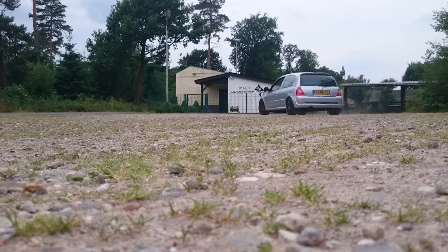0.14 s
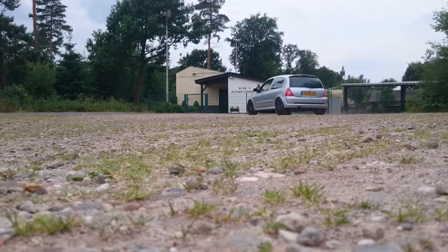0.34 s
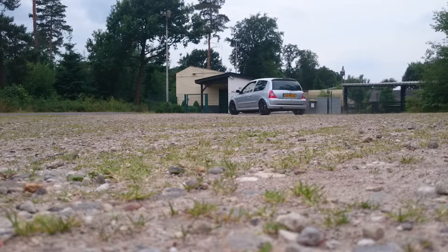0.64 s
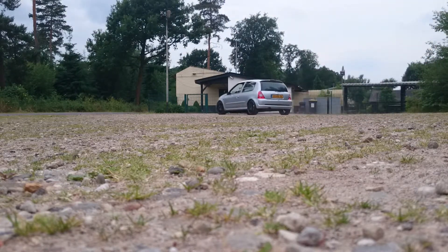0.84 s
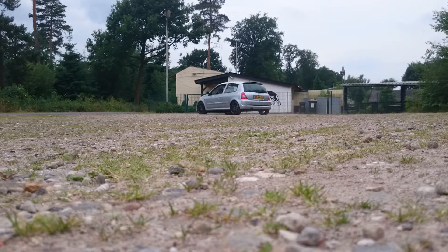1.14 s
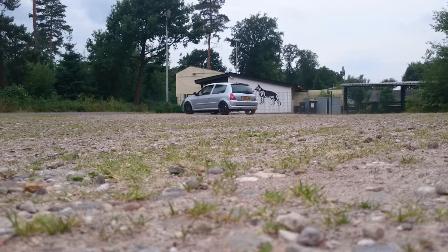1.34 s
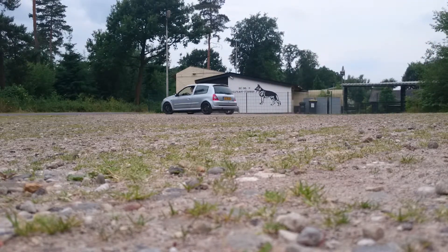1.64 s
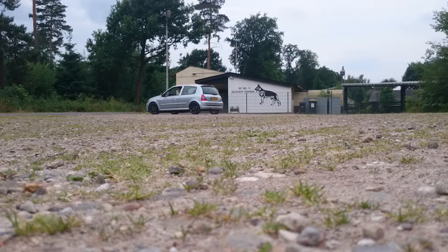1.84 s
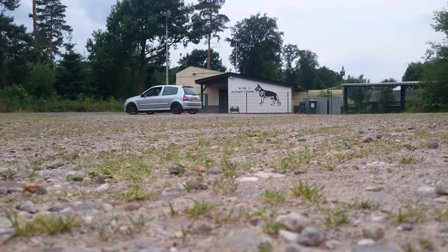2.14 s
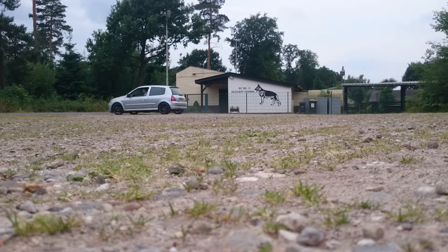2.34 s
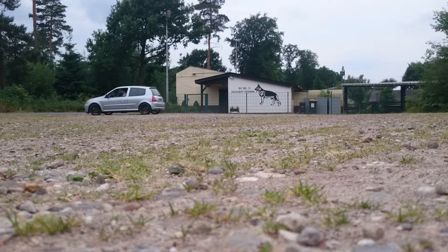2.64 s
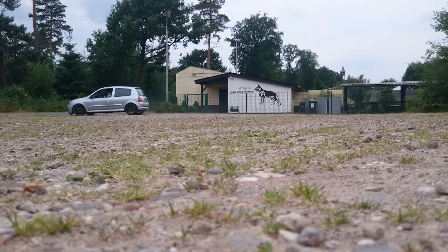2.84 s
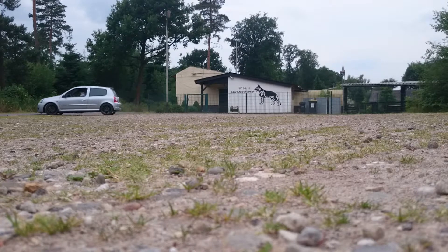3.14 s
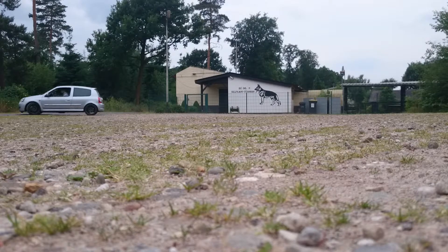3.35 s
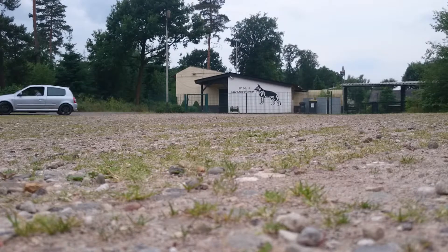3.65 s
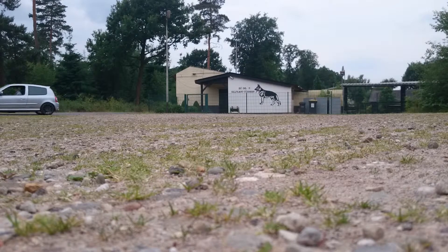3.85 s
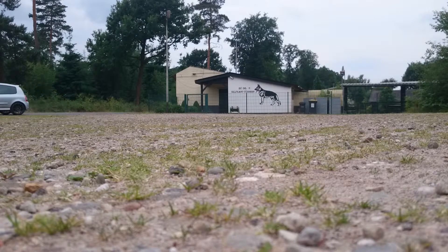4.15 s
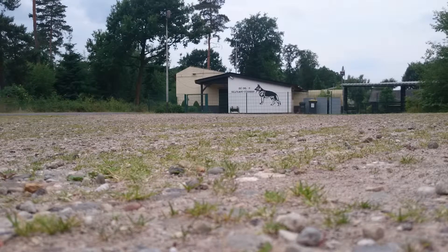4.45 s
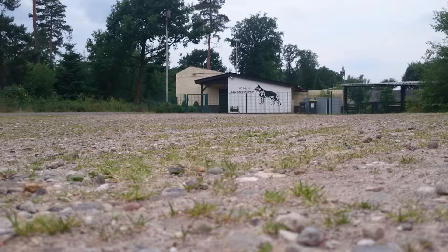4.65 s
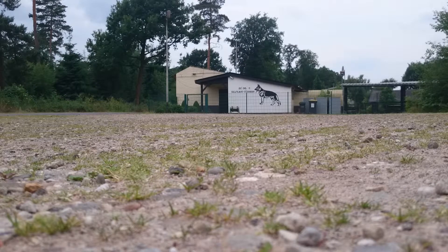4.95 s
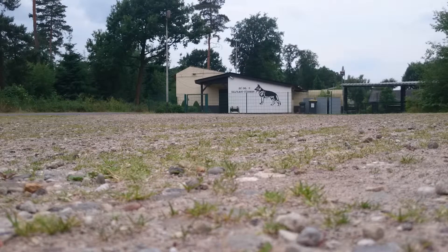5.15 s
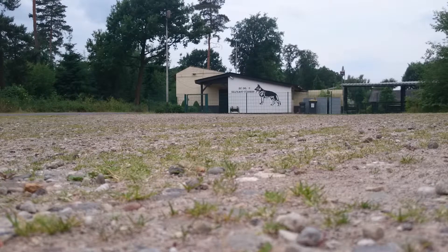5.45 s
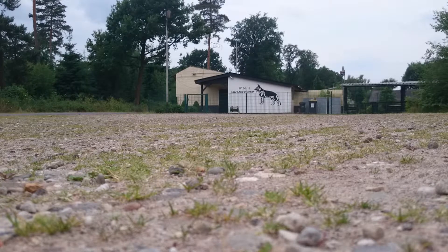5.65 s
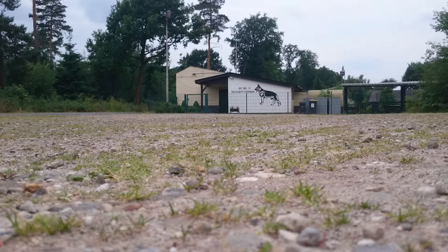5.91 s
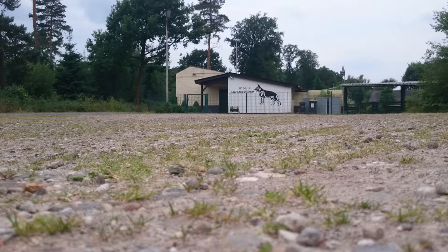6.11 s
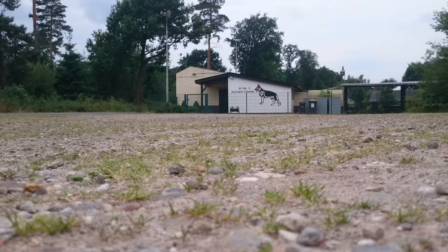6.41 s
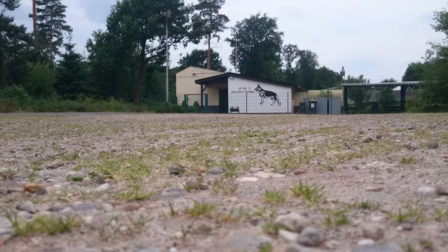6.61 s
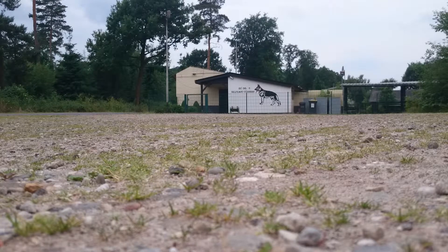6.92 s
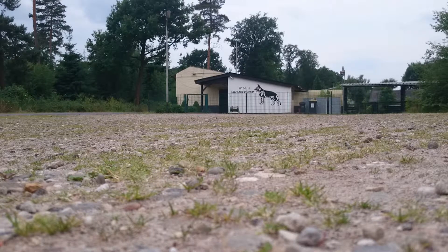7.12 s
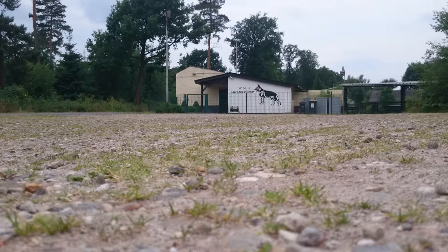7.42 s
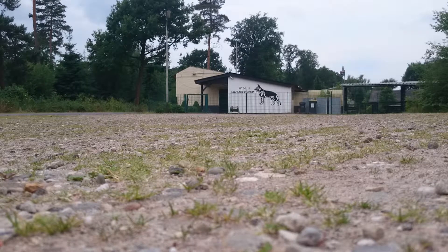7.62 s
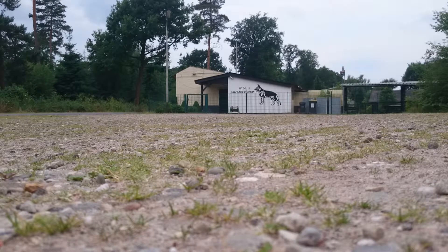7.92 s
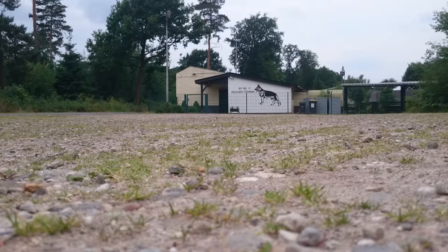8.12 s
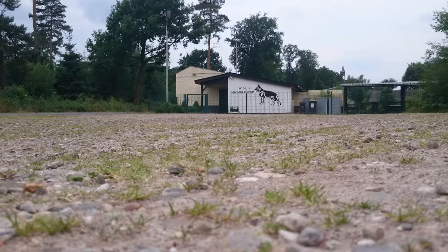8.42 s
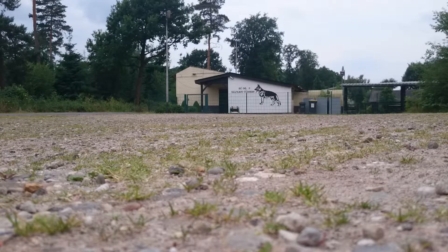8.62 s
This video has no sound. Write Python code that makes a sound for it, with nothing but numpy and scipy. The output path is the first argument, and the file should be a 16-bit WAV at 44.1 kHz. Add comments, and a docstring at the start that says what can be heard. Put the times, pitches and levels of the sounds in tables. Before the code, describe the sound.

Open gravel lot, fixed low stereo microphone, quiet air with slight hiss. From 0 to 4 s a small four-cylinder car creeps past from slightly right of centre toward the left: low, uneven exhaust burble around 55-65 Hz, brief throttle at the start, then nearly idle, with gravel grinding in clumps and dry stone snaps, densest in the first half second. Very faint bird chirps near 1.2 and 3 s. After 4 s the crunch thins and the exhaust boom swells, climbing steadily from 5 s. From 6.3 to 7.5 s it is full throttle, a loud raspy snarl reaching about 220 Hz, tyres spinning and spraying stones. At 7.6 s the throttle shuts: revs drop, hissing and sputtering, a strong bang at 7.85 s and smaller pops after. At 8.23 s the next gear bites with a hard bark near 140 Hz that eases, still driving at the end around 8.8 s. Trees return a soft diffuse echo.

```python
"""Car pulling away over gravel

A small four-cylinder hatchback with a sport exhaust creeps over a gravel lot, then revs hard away to the left.
The driver lifts for a gear change, the exhaust burbles and pops, and the next gear bites.
The engine is a sum of orders (multiples of the firing rate), uneven firing pulses and gas noise; the tyres
are showers of stone contacts. Trees and sheds answer with a diffuse echo, a far bird chirps,
and the two capsules of the stereo microphone have opposite polarity."""
import sys
import numpy as np
from scipy import signal
from scipy.fft import rfft, irfft, next_fast_len
from scipy.io import wavfile
from scipy.ndimage import map_coordinates

SR = 44100
rng = np.random.default_rng(int(sys.argv[2]) if len(sys.argv) > 2 else 0)


def persist_wave(psi):
    """Save psi, clipped to +-1, as 16-bit WAV."""
    counts = np.round(np.clip(psi, -1, 1) * 32767).astype(np.int16)
    wavfile.write(sys.argv[1], SR, np.atleast_2d(counts).T)


N = 386757


def amp(db):
    """Logarithmic level: decibels to amplitude gain."""
    return 10 ** (np.asarray(db) / 20)


def unit(x):
    """Power normalisation: x at rms 1."""
    return x / np.sqrt(np.mean(x ** 2) + 1e-20)


def along(points, hz):
    """Logarithmic frequency scale: (Hz, value) points read on a log axis."""
    f, v = np.transpose(points)
    return np.interp(np.log(hz + 1), np.log(f + 1), v)


def clock():
    """Uniform sampling: the time of every sample in seconds."""
    return np.arange(N) / SR


def curves(rows):
    """Linear interpolation: one value per sample for each column after the time."""
    s, *cols = np.transpose(rows)
    return [np.interp(clock(), s, c) for c in cols]


def level(rows, fade_s=0.16):
    """Level envelope: gain of a (s, dB) curve with exponential decay outside its span."""
    outside = np.maximum(rows[0][0] - clock(), 0) + np.maximum(clock() - rows[-1][0], 0)
    return amp(curves(rows)[0]) * np.exp(-outside / fade_s)


def wobble(rate):
    """Band-limited random modulation: a smooth curve through random knots, rate knots a second."""
    knots = rng.standard_normal(int(N * rate / SR) + 4)
    coarse = np.arange(0, N + 32, 32)
    smooth = map_coordinates(knots, [coarse * rate / SR])
    return np.interp(np.arange(N), coarse, smooth)


def filtered(x, response):
    """Linear filtering: the spectrum of x times a response of frequency."""
    m = next_fast_len(N + SR // 4)
    return irfft(rfft(x, m) * response(np.fft.rfftfreq(m, 1 / SR)), m)[..., :N]


def ring(x, colour, size=8192):
    """Minimum-phase resonance: x through a causal body with the given (Hz, dB) colour."""
    cepstrum = irfft(np.log(amp(along(colour, np.fft.rfftfreq(size, 1 / SR)))))
    # folding the cepstrum onto positive time makes the response causal
    cepstrum[1:size // 2] *= 2
    cepstrum[size // 2 + 1:] = 0
    return signal.oaconvolve(x, irfft(np.exp(rfft(cepstrum))))[:N]


def spikes(times, sizes):
    """Impulse excitation: impulses shared between the two neighbouring samples."""
    at = np.clip(np.asarray(times) * SR, 0, N - 2)
    i = at.astype(int)
    return np.bincount(i, sizes * (1 - at + i), N) + np.bincount(i + 1, sizes * (at - i), N)


# Engine speed: creeping, the pull in first gear, the fall with the clutch out, second gear.
# Each row: time in seconds, firings per second.
SPEED = [(0,58.2),(.5,65.5),(.75,62.5),(1.1,59.5),(1.5,56.7),(2.3,56.6),(2.8,53.6),(3.1,55.3),(3.3,61.3),(3.42,61.5),(3.65,63.7),(3.92,61.4),(4.2,67.7),(4.6,77),(4.9,82.3),
         (5.2,88.2),(5.5,101.7),(5.8,115),(6.35,154.1),(6.9,190),(7.2,208.4),(7.55,222.6),(7.75,207),(8.12,165),(8.23,144),(8.29,139),(8.36,138),(8.77,145.6)]


def firing_rate():
    """Fundamental frequency: the firing rate, on which every engine order is built."""
    return curves(SPEED)[0]


# Throttle opening. Each row: time in seconds, opening from 0 to 1.
THROTTLE = [(0, 0.34), (.55, 0.13), (.72, 0.02), (1.55, 0.16), (2.4, 0.02), (3.05, 0.07), (3.22, 0.21),
            (3.97, 0.16), (4.7, 0.52), (5.95, 0.4), (6.3, 0.96), (7.545, 0.76), (7.595, 0), (7.75, 0.14),
            (8.0, 0), (8.215, 0.07), (8.24, 0.98), (8.46, 0.67), (8.57, 0.31), (8.77, 0.5)]


def throttle():
    """Load control: how far the throttle is open, 0-1."""
    return np.clip(curves(THROTTLE)[0], 0, 1)


# the gear change: the throttle shuts, the burble builds, the next gear bites with a surge that dies away
LIFT_S, BURBLE_RISE_S = 7.61, 0.05
BITE_S, BITE_RISE_S, SURGE_FADE_S = 8.228, 0.016, 0.28


def bite():
    """Clutch engagement: rises from 0 to 1 as the next gear engages."""
    return np.clip((clock() - BITE_S) / BITE_RISE_S, 0, 1)


def surge():
    """Transient load: rises as the next gear bites, then decays exponentially."""
    return bite() * np.exp(-np.abs(clock() - BITE_S) / SURGE_FADE_S)


def overrun():
    """Overrun: rises to 1 after the lift and ends as the next gear bites."""
    return np.clip((clock() - LIFT_S) / BURBLE_RISE_S, 0, 1) * (1 - bite())


def order(turns, k):
    """Harmonic phase: k times the firing rate, the orders aligned into one pulse smeared by the long pipe."""
    skew, smear = .2, .24
    return -np.cos(2 * np.pi * k * turns - (skew + smear * k) * (k - 1))


# Level of the boom at the firing rate. Each row: time in seconds, level in dB.
BOOM = [(0,-22),(.5,-20.5),(1.6,-26.5),(2.15,-33),(2.95,-29.5),(3.3,-23),(3.92,-23.5),(4.03,-15.5),(5.15,-15),(5.45,-13.5),(6.1,-17.5),(6.45,-14.5),(6.75,-18),(7,-15.5),(7.25,-19),
        (7.57,-18.5),(7.615,-30),(7.66,-18),(8.02,-16.5),(8.195,-25),(8.245,-11),(8.45,-14),(8.6,-18.5),(8.77,-14)]
# Level of the hum at twice the firing rate. Each row: time in seconds, level in dB.
SECOND = [(0,-27.5),(.5,-29.5),(.8,-46.5),(2.1,-29.5),(2.45,-42),(2.9,-26.5),(3.3,-26),(4.1,-31.5),(5,-26),(5.85,-22),(6.14,-35.5),
          (6.35,-24),(6.8,-22),(7,-28),(7.3,-19.5),(7.57,-21),(7.63,-45.5),(7.8,-28.5),(8,-44.5),(8.222,-49),(8.245,-20),(8.77,-34)]
# Level of the hum at three times the firing rate. Each row: time in seconds, level in dB.
THIRD = [(0,-30.5),(.5,-30),(.7,-37),(2.2,-39.5),(3,-38),(3.25,-29),(3.42,-37),(3.65,-32),(4,-27.5),(4.45,-39.5),(5.25,-29),(5.8,-42),(6.15,-31),
         (6.35,-47.5),(6.7,-30.5),(7.33,-38),(7.45,-36),(7.56,-39),(7.62,-61.5),(8.222,-64),(8.245,-25.5),(8.77,-39)]


def drone(turns, rough=0.049, waver_db=1.0, sputter=0.39):
    """Harmonic synthesis: the three lowest orders boom; on the overrun they throb every fourth firing."""
    second = level(SECOND) * amp(waver_db * wobble(7))
    third = level(THIRD) * amp(waver_db * wobble(8))
    throb = sputter * overrun() * np.cos(2 * np.pi * turns / len(CYLINDERS))
    out = np.zeros(N)
    for k, gain in enumerate([level(BOOM), second, third], 1):
        swell = 1 + rough * k * wobble(35) + throb
        out += np.sqrt(2) * gain * swell * order(turns, k)
    return out


# Return from the far wall, as the car passes it. Each row: time in seconds, level in dB re the direct boom.
WALL = [(3.9, -26), (4.6, -19), (5.2, -12), (5.7, -28), (8.2, -26), (8.55, -18)]
WALL_DELAY_S = .177


def wall(x):
    """Delayed interference: a far wall returns the boom, which beats against it as the pitch climbs."""
    late = np.interp(clock() - WALL_DELAY_S, clock(), x, left=0)
    return x + amp(curves(WALL)[0]) * late


# The upper orders come and go as the revs rise. Each row: firings per second, level in dB at full throttle
# before the surge.
TUNING = [(58, -46.5), (68, -47), (80, -48.5), (95, -46), (120, -49.5), (140, -49.5), (155, -43.5),
          (170, -49.5), (195, -42.5), (212, -44), (223, -49)]
IDLE_AIR = 0.036  # share of the air that passes a shut throttle
SURGE_DB = 10


def overtones(firing_hz):
    """Source and resonator: the cylinders' charge times the pipe's tuning sets the upper orders' gain."""
    charge = (IDLE_AIR + (1 - IDLE_AIR) * throttle()) * amp(SURGE_DB * surge())
    return charge * amp(along(TUNING, firing_hz))


# Upper orders of the firing rate. Each row: multiple of the firing rate, relative level in dB.
ORDERS = [(4, 10.5), (5, 10), (6, 5.5), (7, 1.7), (8, -4.5), (9, -8), (10, -12.6)]
# Pipe resonances on the upper orders. Each row: frequency in Hz, gain in dB.
PIPE = [(215,3), (260,8.5), (330,-7.5), (400,3), (470,-5.5), (560,0), (620,0.5), (700,-0.5), (780,-3),
        (850,3.5), (920,2), (1000,4), (1080,7.5), (1160,-5), (1300,1), (1600,-5)]


def bark(turns, firing_hz, upper, waver_db=1.0, bark_db=0.24, rough=.13):
    """Formant resonance: ragged upper orders swell as they sweep through the pipe's resonances."""
    shaken = turns + .006 * wobble(60)
    out = np.zeros(N)
    for k, db in ORDERS:
        gain = amp(db + along(PIPE, k * firing_hz) + waver_db * wobble(11))
        ragged = 1 + rough * wobble(70)
        out += gain * ragged * order(shaken, round(k))
    return np.sqrt(2) * upper * amp(bark_db) * out


# Departure of each cylinder's pulse from the mean. Each entry: relative size, in firing order.
CYLINDERS = [0.72, -0.22, 0.0073, -0.14]


def uneven(turns, scatter):
    """Subharmonic excitation: each firing departs from the mean by a four-cylinder pattern plus chance."""
    firing = np.arange(1, int(turns[-1]))
    times = np.interp(firing, turns, clock())
    sizes = np.take(CYLINDERS, firing % len(CYLINDERS)) + scatter * rng.standard_normal(len(firing))
    # the root of the spacing keeps the power steady as the firings crowd together
    return spikes(times, sizes * np.sqrt(np.gradient(times)))


RASP_HZ = 200  # reference firing rate for levels that grow with revs
# Colour of uneven firing under load. Each row: frequency in Hz, gain in dB.
LOADED = [(30, -33), (60, -22.5), (100, -1), (170, 3), (260, -4), (300, 0), (350, 2), (450, -14),
          (600, -12), (1200, -56), (3000, -90.5)]
# Colour of uneven firing with the throttle shut. Each row: frequency in Hz, gain in dB.
COASTING = [(30, -20), (60, -12), (90, 5.5), (160, -6.5), (245, 0.5), (330, -10), (440, -18), (510, -14),
            (600, -34), (1200, -68), (3000, -91.5)]
# uneven firing: base, then added by full throttle, on the overrun, and as the next gear bites
BURBLE_DB, BURBLE_THROTTLE_DB, BURBLE_OVERRUN_DB, BURBLE_SURGE_DB = -39.5, 9, 16, 9


def burble(turns, firing_hz, loaded_db=0.5, coasting_db=0.0, db_per_octave=2.5):
    """Impulse-driven resonance: unequal firings thump the silencer, recoloured as the throttle shuts."""
    opening = throttle()
    growth_db = db_per_octave * np.log2(firing_hz / RASP_HZ)
    loaded = amp(loaded_db + growth_db) * unit(ring(uneven(turns, scatter=0.33), LOADED))
    coasting = amp(coasting_db) * unit(ring(uneven(turns, scatter=0.42), COASTING))
    db = BURBLE_DB + BURBLE_THROTTLE_DB * opening
    db = db + BURBLE_OVERRUN_DB * overrun() + BURBLE_SURGE_DB * surge()
    # equal-power crossfade with the throttle
    return amp(db) * (np.sin(np.pi / 2 * opening) * loaded + np.cos(np.pi / 2 * opening) * coasting)


# Colour of gas tearing out of the tailpipe. Each row: frequency in Hz, gain in dB.
RASP_COLOUR = [(200, -36), (480, 12), (620, 5), (850, 5.5), (1050, 5.5), (1350, -0.5), (1800, -18.5),
               (2600, -32), (5000, -47)]
# base at full throttle and RASP_HZ, growth with revs, loss with the throttle shut, added by the surge
RASP_DB, RASP_DB_PER_OCTAVE, RASP_SHUT_DB, RASP_SURGE_DB = -27.5, 13, -10, 5.5


def rasp(turns, firing_hz, pulse_db=-10, gas_db=-2, puff=0.18, sputter_db=4.0):
    """Modulated jet noise: pulse fronts and puffs of turbulence snarl, more so with revs and throttle."""
    fronts = unit(ring(uneven(turns, scatter=0.19), RASP_COLOUR))
    puffs = np.exp(puff * np.cos(2 * np.pi * turns))
    gas = unit(ring(rng.standard_normal(N) * puffs, RASP_COLOUR))
    db = RASP_DB + RASP_DB_PER_OCTAVE * np.log2(firing_hz / RASP_HZ)
    db = db + RASP_SHUT_DB * (1 - throttle()) + RASP_SURGE_DB * surge()
    sputter = sputter_db * overrun() * wobble(40)
    return amp(db + sputter) * (amp(pulse_db) * fronts + amp(gas_db) * gas)


# Colour of the bright rush of gas on the overrun. Each row: frequency in Hz, gain in dB.
RUSH_COLOUR = [(500, -26), (900, 2.5), (1700, 0), (2600, -5.5), (3300, -10.5), (4500, -33.5), (9000, -49.5)]


def rush(turns, firing_hz, rush_db=-36, db_per_octave=14, puff=.25, falling_db=-10):
    """Flow noise: on the overrun the pipe hisses, and a broken trace of the fourth order falls with the revs."""
    puffs = np.exp(puff * np.cos(np.pi * turns))  # one puff every second firing
    gas = unit(ring(rng.standard_normal(N) * puffs, RUSH_COLOUR))
    falling = amp(falling_db) * wobble(45) * order(turns, k=4)
    growth_db = db_per_octave * np.log2(firing_hz / RASP_HZ)
    return overrun() * amp(rush_db + growth_db) * (gas + falling)


# labouring: centre and width of its range of firing rates, level of the half order it adds
LUG_HZ, LUG_WIDTH_HZ, LUG_DB = 69.2, 7.7, -30


def lug(turns, firing_hz, waver_db=2.0):
    """Half-order vibration: labouring at low revs adds an unsteady tone between the first two orders."""
    near = np.exp(-((firing_hz - LUG_HZ) / LUG_WIDTH_HZ) ** 2)
    strength = amp(LUG_DB + waver_db * wobble(14)) * near
    return np.sqrt(2) * strength * order(turns, 1.5)


# Fuel igniting in the pipe. Each row: time in seconds, peak level in dB.
POPS = [(7.844, -6), (8.02, -22), (8.129, -17), (8.228, -11)]
# Colour of a pop. Each row: frequency in Hz, gain in dB.
POP_COLOUR = [(40, -15), (100, -6), (260, 10), (450, -8.5), (800, -13), (1500, -36), (5000, -76)]


def pops():
    """Impulse response: single bangs ring the pipe around the gear change."""
    s, db = np.transpose(POPS)
    peak = np.abs(ring(spikes([0], 1.0), POP_COLOUR)).max()
    return -ring(spikes(s, amp(db)), POP_COLOUR) / peak


# Whine of a toothed drive on the engine. Each row: time in seconds, level in dB.
WHINE = [(4.1, -87), (4.45, -74), (5, -79), (5.4, -83), (5.7, -92)]


def whine(turns, slip=.12):
    """Gear-mesh tone: 44 teeth mesh per firing, with a slightly unsteady phase."""
    teeth = 44
    return level(WHINE) * np.sqrt(2) * np.sin(2 * np.pi * (teeth * turns + slip * wobble(90)))


def grains(colour, rate, spread_db):
    """Random impulse train: many tiny stone contacts per second, a few much louder than the rest."""
    when, size, sign = rng.random((int(rate * N / SR), 3)).T
    loud_db = spread_db * np.minimum(-np.log(1 - size), 4)
    contacts = spikes(when * N / SR, amp(loud_db) * np.sign(sign - .5))
    return unit(ring(contacts, colour))


# Tyres rolling slowly over stones. Each row: time in seconds, level in dB before crunch_db.
CRUNCH = [(0, -33.5), (.25, -38), (.7, -40), (2.6, -41.5), (3.1, -45.5), (4.6, -49.5)]
# A tyre grinds through a loose patch. Each row: start in seconds, length in seconds, dB over the rolling.
PATCHES = [(.32,0.16,2),(0.813,0.21,4.5),(1.123,0.058,11),(1.41,0.024,10),(1.483,0.042,10),(1.67,0.066,5.5),(2.078,0.31,3.5),(2.56,0.082,3),(3.146,0.045,11),(3.212,0.29,9),(4.019,0.029,8.5)]
PATCH_ATTACK_S, PATCH_RELEASE_S = .016, 0.04
# Colour of ground gravel. Each row: frequency in Hz, gain in dB.
GRAVEL_COLOUR = [(200, -25.5), (450, -10), (750, 0.5), (1100, -1), (1500, -7.5), (2200, -14.5), (3200, -25),
                 (4400, -45.5), (9000, -55.5)]


def crunch(clump_db=2.17, crunch_db=-2.0):
    """Granular contact noise: slow tyres grind the gravel in clumps, louder in the loose patches."""
    contacts, t = grains(GRAVEL_COLOUR, rate=3200, spread_db=3.8), clock()
    swells = []
    for s, length, db in PATCHES:
        attack = np.clip((t - s) / PATCH_ATTACK_S, 0, 1)
        release = np.exp(-np.maximum(t - s - length, 0) / PATCH_RELEASE_S)
        swells.append(db * attack * release)
    loose_db = np.max(swells, axis=0)
    return level(CRUNCH) * amp(crunch_db + loose_db + clump_db * wobble(45)) * contacts


# Stones snapping under a tyre. Each row: time in seconds, relative level in dB, middle pitch in Hz.
STONES = [(.05,-25,1100), (0.098, -22, 1090), (0.317, -15, 1600), (.322,-19.5,1140), (.349,-24,1390),
          (.377, -22, 1390), (.384,-22,1160), (.413,-25,860), (0.433, -17.5, 1190), (.455, -19.5, 1250),
          (.535,-21.5,1300), (.566, -24, 1510), (.59,-26,1700), (.785,-24,1310), (.833, -22, 1010),
          (.957, -24, 1100), (1.169, -21, 1000), (1.188,-23,1000), (1.308,-23,1180), (1.358,-23,1197),
          (1.435, -20, 940), (1.515,-24,990), (1.674,-24,1190), (1.699,-24,900), (1.899, -22, 1200),
          (2.093, -22, 1090), (2.311,-28,1320), (2.404,-25,1200), (2.462,-26,1200), (2.534,-27,1181),
          (2.604,-27,1090), (2.759, -25, 900), (3.164, -23.5, 1050), (3.176,-24,1200), (3.183, -19, 1251),
          (3.215,-27,950), (3.239,-23,830), (3.304, -30, 1250), (3.394, -20.5, 900), (3.418,-26,1100),
          (3.496, -30, 1400), (3.886, -31, 1301), (3.976, -28, 1103), (4.02,-30,1060), (4.045, -26, 1100),
          (4.056, -25, 1200), (4.444, -30, 1402)]
# Colour of a stone's sharp crack. Each row: frequency in Hz, gain in dB.
CRACK_COLOUR = [(300,-41),(800,16.5),(2700,-7),(3600,-21),(4600,-32),(9000,-51)]
# time constant of the attack; time for the middle pitch to fall 60 dB
STONE_ATTACK_S, STONE_RING_S = .0005, .014
STONE_TOP_HZ = 3900  # the dirt around the stones muffles their treble


def stones(spread=0.546, stone_db=-4.0, crack_db=-6, settle=0.38, settle_s=0.016, count=9):
    """Modal impact: a pinched stone cracks in short tones, high ones dying first, then its neighbours settle."""
    out, t = np.zeros(N), np.arange(SR // 12) / SR
    crack = ring(spikes([0], 1), CRACK_COLOUR)[:len(t)]
    crack = amp(crack_db) * crack / np.abs(crack).max()
    for s, db, hz in STONES:
        place = (np.arange(count) + rng.random(count))[:, None] / count
        ratio = np.exp(spread * (2 * place - 1))
        tones = np.sin(2 * np.pi * (hz * ratio * t + rng.random((count, 1))))
        tones *= amp(-60 * t * ratio / STONE_RING_S)
        snap = tones.sum(0) * (1 - np.exp(-t / STONE_ATTACK_S))
        hits = rng.standard_normal(len(t)) * (rng.random(len(t)) < 300 / SR)  # about 300 a second
        contacts = settle * hits * np.exp(-t / settle_s)
        contacts[0] = 1
        stone = signal.fftconvolve(snap / np.abs(snap).max() + crack, contacts)[:len(t)]
        out[round(s * SR):][:len(t)] += amp(db + stone_db) * stone
    return filtered(out, lambda hz: 1 / np.sqrt(1 + (hz / STONE_TOP_HZ) ** 12))


# Tyres at speed throwing grit. Each row: time in seconds, level in dB before the shares of coarse and fine,
# wheelspin from 0 to 1.
SPRAY = [(4.2, -74, 0.07), (4.8, -58, 0.71), (5.95, -49.5, 0.92), (6.3, -38, 0.91), (7.0, -32, 0.98),
         (7.53, -30, 0.98), (7.6, -38.5, 0.87), (7.75, -35, 0.91), (8.2, -42, 0.88), (8.5, -51, 0),
         (8.77, -47.5, .05)]
# Colour of coarse thrown stones. Each row: frequency in Hz, gain in dB.
SPRAY_COLOUR = [(400, -19.5), (1000, 6), (1700, 0.5), (2400, -6), (3300, -12.5), (4300, -30), (5600, -27.5),
                (8000, -26.5), (10000, -37.5), (15500, -41.5)]
# Colour of fine grit. Each row: frequency in Hz, gain in dB.
GRIT_COLOUR = [(600, -18.5), (1800, 5), (2800, -1), (3600, 1), (4300, -11), (5600, -11), (8000, -11),
               (10000, -26), (15500, -44)]


def spray(clump_db=1, coarse_db=-1, fine_db=-3):
    """Dense granular noise: fast tyres hiss over fine grit and, while they spin, throw coarse stones."""
    spin = np.clip(curves(SPRAY)[1], 0, 1)
    coarse = amp(coarse_db) * spin * grains(SPRAY_COLOUR, rate=9000, spread_db=4.0)
    fine = amp(fine_db) * np.sqrt(1 - spin ** 2) * grains(GRIT_COLOUR, rate=16000, spread_db=5.0)
    return level(SPRAY) * amp(clump_db * wobble(40)) * (coarse + fine)


def grazing(grit):
    """Ground absorption: grazing the ground soaks up the treble of the direct path."""
    return filtered(grit, lambda hz: 1 / np.sqrt(1 + (hz / 5500) ** 6))


# Deep rumble while the car is near. Each row: time in seconds, level in dB.
RUMBLE = [(0, -36.5), (1.5, -54.5), (3.5, -46.5), (4.6, -46.5), (6, -54.5), (8.77, -65)]
# Colour of the rumble. Each row: frequency in Hz, gain in dB.
RUMBLE_COLOUR = [(10, -8), (25, -1.5), (45, -7.5), (80, -19), (160, -21.5), (600, -66)]


def rumble():
    """Low-frequency noise: a deep, toneless rumble that fades as the car leaves."""
    return level(RUMBLE) * unit(ring(rng.standard_normal(N), RUMBLE_COLOUR))


# Bearing of the car. Each row: time in seconds, lead of the left capsule in milliseconds.
BEARING = [(0, -0.078), (2.75, 0.076), (5.25, 0.27), (6.25, .39), (7.0, 0.42), (7.8, 0.3), (8.77, 0.21)]


def arrive(x):
    """Interchannel time difference: the direct sound reaches the nearer capsule first."""
    lead = curves(BEARING)[0] * SR / 1000  # in samples
    return np.array([map_coordinates(x, [np.arange(N) + side * lead / 2], mode="nearest") for side in (1, -1)])


# Chirps of a far bird. Each row: middle in seconds, length in seconds, mean pitch in Hz,
# level in dB before the echo.
CHIRPS = [(1.223, .07, 4000, -64), (1.306, .09, 4385, -81), (3.008, .11, 4100, -72)]


def bird(warble=0.04):
    """Frequency modulation: a fast random warble makes the faint chirps buzzy."""
    t, waver = clock(), 1 + warble * wobble(110)
    out = np.zeros(N)
    for s, length, hz, db in CHIRPS:
        envelope = np.exp(-(2 * (t - s) / length) ** 2)
        out += amp(db) * envelope * np.sin(2 * np.pi * hz * np.cumsum(waver) / SR)
    return out


# Sound from all around. Each row: frequency in Hz, likeness at the two capsules from 0 to 1.
ALIKE = [(60, 0.55), (250, 0.92), (600, 0.88), (1200, 0.17), (2200, 0.055), (15000, 0)]


def diffuse(colour, size):
    """Diffuse-field coherence: noise alike at both capsules in the bass, unrelated in the treble."""
    m = next_fast_len(size)
    hz = np.fft.rfftfreq(m, 1 / SR)
    turn = np.arccos(np.clip(along(ALIKE, hz), -1, 1)) / 2
    white = rfft(rng.standard_normal((2, m)))
    shaped = white * amp(along(colour, hz)) * [np.cos(turn), np.sin(turn)]
    mid, side = irfft(shaped, m)[:, :size]
    return np.array([mid + side, mid - side])


# Decay of the answer of trees and sheds. Each row: frequency in Hz, time in seconds to fall 60 dB.
ECHO_TIME = [(200, 0.5), (1500, 2), (8000, 2)]
# Colour of that answer. Each row: frequency in Hz, gain in dB.
ECHO_COLOUR = [(100, 12), (600, -6.5), (2500, -3), (4500, 10), (8000, 4.5), (13000, 6)]


def surroundings(x):
    """Diffuse reverberation: trees and sheds scatter the sound back for half a second; the bass dies first."""
    hz, t, z = signal.stft(diffuse(ECHO_COLOUR, size=SR // 2), SR, nperseg=256)
    decay = amp(-60 * t / along(ECHO_TIME, hz)[:, None])
    energy = np.sum(decay ** 2, axis=1, keepdims=True) * t[1] * SR
    tail = signal.istft(z * decay / np.sqrt(energy), SR, nperseg=256)[1]
    late = np.pad(x, (SR // 100, 0))  # the first return comes 10 ms late
    return signal.oaconvolve(late[None], tail, axes=1)[:, :N]


# Still air and microphone hiss. Each row: frequency in Hz, density in dB per Hz before the level below.
AIR = [(20, -77), (60, -67.5), (200, -64), (700, -74.5), (2000, -87), (4400, -105), (7500, -102),
       (9000, -106), (11000, -116), (15500, -120)]
# Level of the air. Each row: time in seconds, level in dB.
AIR_LEVEL = [(0, -5), (4.3, -3.5), (5.6, -13.5), (8.77, -3)]


def still_air():
    """Stationary noise spectrum: still air and microphone hiss under a slow level curve."""
    return level(AIR_LEVEL) * diffuse(AIR, size=N) * np.sqrt(SR / 2)


def scene():
    """Superposition: exhaust and tyres move together across the open lot, over echo and air."""
    firing_hz = firing_rate()
    turns = np.cumsum(firing_hz) / SR  # firings so far
    upper = overtones(firing_hz)
    boom = wall(drone(turns)) + burble(turns, firing_hz) + lug(turns, firing_hz) + pops() + rumble()
    note = bark(turns, firing_hz, upper)
    snarl = rasp(turns, firing_hz) + rush(turns, firing_hz) + whine(turns)
    gravel, grit = crunch() + stones(), spray()
    # the bird is heard only by way of the echo
    sent = amp(-6.5) * note + amp(-10.5) * snarl + amp(-9.5) * gravel + amp(-9.0) * grit + amp(-5.0) * bird()
    echo = surroundings(sent)
    air = still_air()
    return arrive(boom + note + snarl + gravel + grazing(grit)) + echo + air


# Balance of the capsules. Each row: frequency in Hz, left minus right in dB.
BALANCE = [(60, -2.15), (400, -2.1), (1300, -1.1), (2500, -.2), (3700, 1), (4900, 4.5), (6200, -2.5),
           (9000, 0)]
TOP_HZ = 15600  # band limit


def record(dry):
    """Polarity and band limiting: the right capsule is inverted, louder in the bass; no treble above TOP_HZ."""
    def capsules(hz):
        """Channel imbalance: the level difference is split evenly between left and right."""
        half_db = along(BALANCE, hz) / 2
        return np.array([amp(half_db), -amp(-half_db)])
    return filtered(dry, lambda hz: capsules(hz) * (hz < TOP_HZ))


dry = scene()
out = record(dry)
persist_wave(out)
```